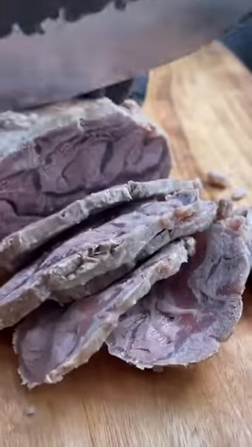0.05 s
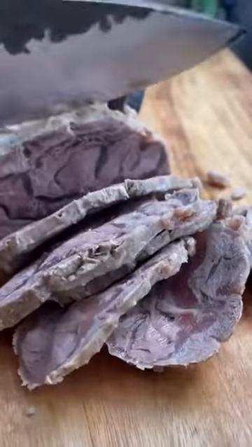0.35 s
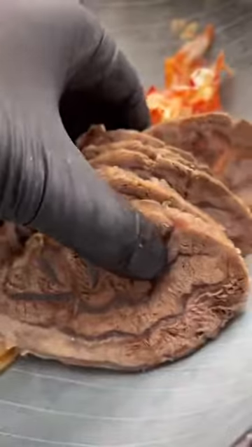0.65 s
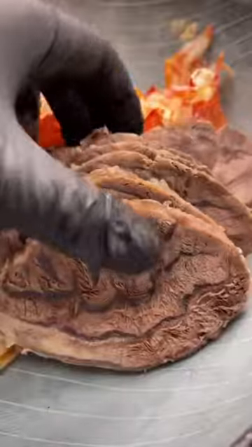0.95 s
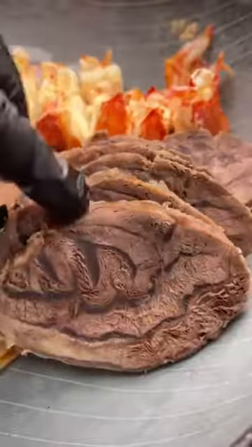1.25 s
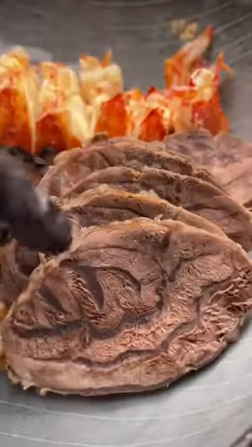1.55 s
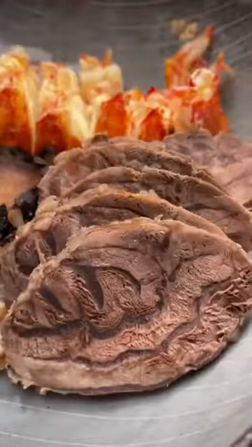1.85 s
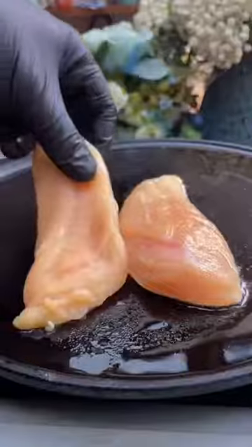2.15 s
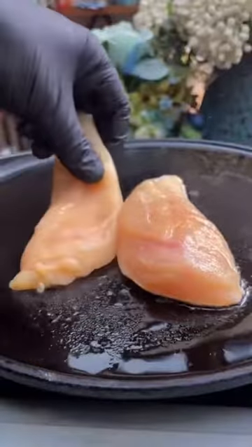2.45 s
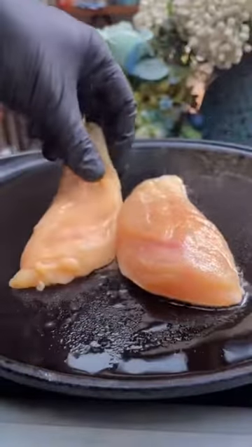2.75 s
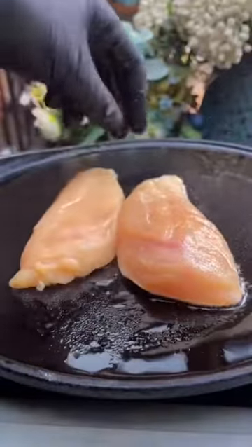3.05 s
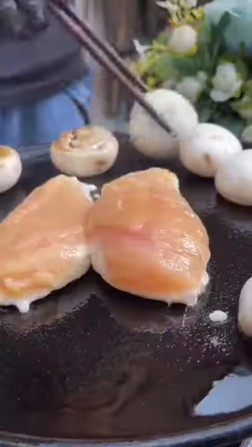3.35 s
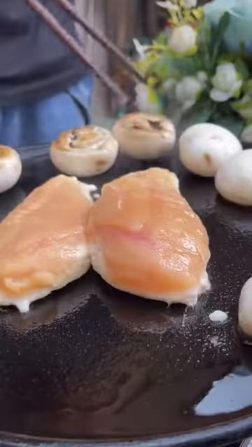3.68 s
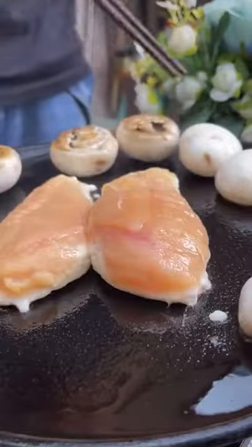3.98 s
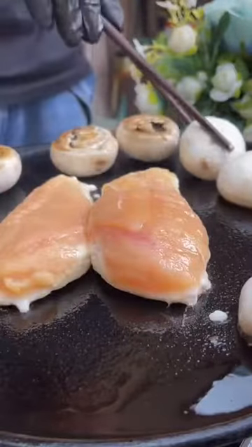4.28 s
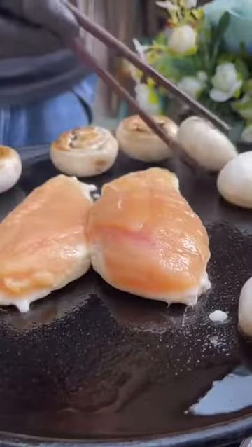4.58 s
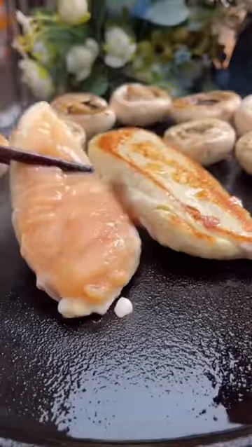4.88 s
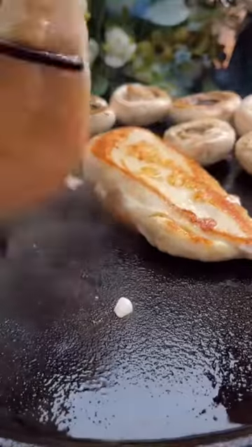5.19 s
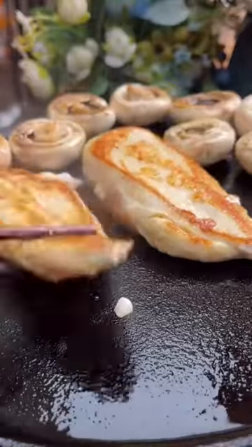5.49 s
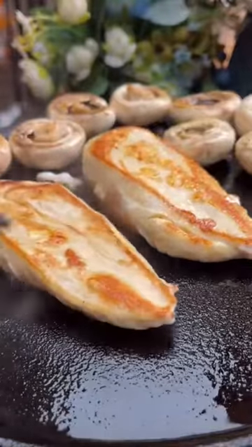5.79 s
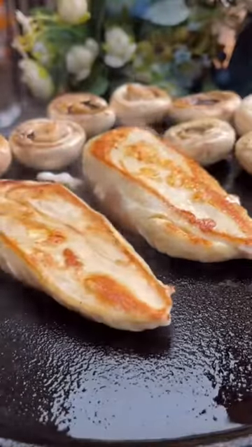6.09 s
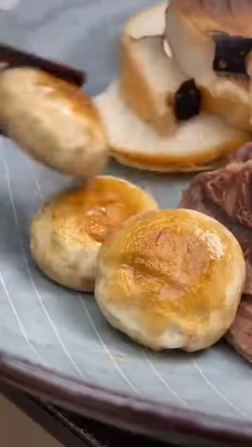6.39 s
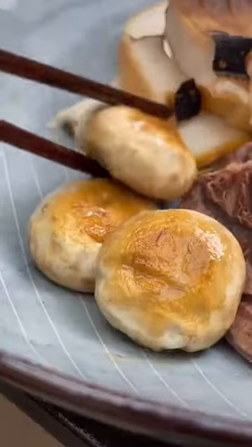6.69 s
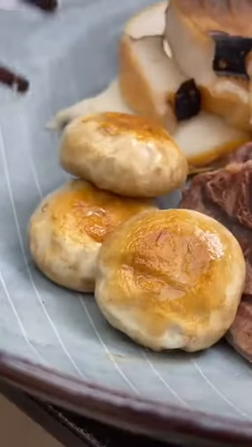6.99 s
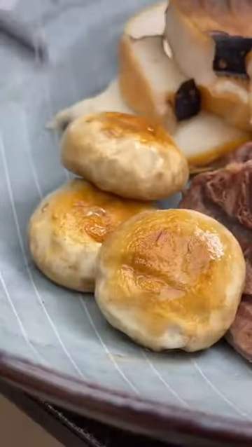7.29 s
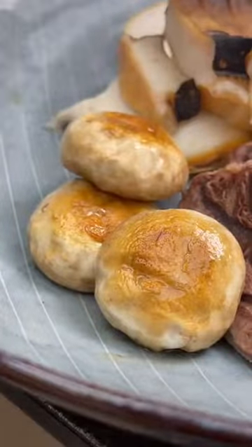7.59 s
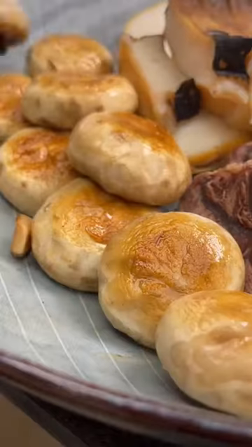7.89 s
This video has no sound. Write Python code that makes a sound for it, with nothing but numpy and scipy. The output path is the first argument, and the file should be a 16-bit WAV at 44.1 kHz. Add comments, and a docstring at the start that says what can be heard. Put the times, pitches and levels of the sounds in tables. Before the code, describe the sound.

Faint wet ticks of meat being cut and handled, then chicken and mushrooms sizzle loudly in hot oil with spits and pops.

```python
"""Beef on the board, chicken in the pan

A humming kitchen, heard close up on a phone's two microphone ports, in seven short shots cut together.
At the board a knife and a gloved hand work moist boiled beef, with small wet ticks. Then chicken and
mushrooms sizzle in an oiled pan: steam bubbles burst and flare up, fat spits, mushrooms sputter as
chopsticks turn them, and food knocks on pan and plate."""
import sys
import numpy as np
from scipy import signal
from scipy.fft import rfft, irfft, next_fast_len
from scipy.io import wavfile
from scipy.ndimage import uniform_filter1d, map_coordinates

SR = 44100
rng = np.random.default_rng(int(sys.argv[2]) if len(sys.argv) > 2 else 0)


def digitize_waveform(pressure):
    """Quantize a signal to 16-bit integers and store it at the path in sys.argv[1].

    Rows of a 2-D input are taken as channels; values are limited to [-1, 1].
    """
    field = np.atleast_2d(pressure).T
    bounded = np.clip(field, -1, 1)
    quanta = np.round(bounded * 32767).astype(np.int16)
    wavfile.write(sys.argv[1], SR, quanta)


N = 350154

# The four stages of frying (chicken, mushrooms, searing, plating): start/s, end/s, bubbles/(1/s),
# size scatter/dB, clumping/dB, cracks/(1/s), level before flares/dB
FRYING_STAGES = [(1.97, 3.244, 3240, 2.5, 2.5, 123, -21.5), (3.242, 4.835, 5700, 2.5, 1, 80, -23),
                 (4.834, 6.286, 12000, 2, 0.5, 11, -20), (6.282, 7.939, 9900, 3, 0.37, 72, -25)]


def sizzle():
    """Two patches of food fry: the nearer to the left of the microphones, the farther to the right."""
    far_gain = amp(-6)
    near = ports(frying(), spread=.06)
    far = far_gain * ports(frying(), spread=.06, side=-1)
    return flaring(near + far) / np.hypot(1, far_gain)


def frying():
    """Water flashes to steam in the oil: clumps of bursting bubbles and sharp cracks over a fine hiss."""
    # Spectrum of the sizzle at each stage: f/Hz, relative level/dB
    chicken = [(120, -39), (450, -28), (800, -22.5), (1250, -21.5), (2400, -13.5), (3500, -13.5),
               (4500, -10.5), (5600, -7.5), (7600, -7.5), (9200, 2), (10300, -1), (11400, -1), (12300, -17),
               (15200, -19.5)]
    mushrooms = [(120, -24.5), (450, -22.5), (800, -20.5), (1250, -14), (2400, -12), (3500, -13.5),
                 (4500, -5.5), (5600, -5.5), (7600, -3.5), (9200, -0.5), (10300, 4), (11400, 3.5),
                 (12300, -5), (15200, -30.5)]
    searing = [(120, -33), (450, -24.5), (800, -18.5), (1250, -17), (2400, -11), (3500, -11), (4500, -4),
               (5600, -3), (7600, -2), (9200, -4.5), (10300, 6), (11400, 3.5), (12300, -6.5), (15200, -17)]
    plating = [(120, -24.5), (450, -20), (800, -18.5), (1250, -17.5), (2400, -14), (3500, -7.5), (4500, -8),
               (5600, -7), (7600, -4), (9200, -3), (10300, 1), (11400, -1), (12300, -11), (15200, -34)]
    pan = np.zeros(N)
    for stage, colour in zip(FRYING_STAGES, (chicken, mushrooms, searing, plating)):
        start, end, rate, scatter_db, clump_db, crack_rate, db = stage
        span = slice(round(start * SR), min(round(end * SR), N))
        size = span.stop - span.start
        clumps = amp(clump_db * (wobble(300, size) + .7 * wobble(55, size)))
        fizz = clumps * bubbles(rate, scatter_db, size) + .52 * rng.standard_normal(size)
        fizz = patchy(fizz, depth_db=1.3)
        fizz = unit(fizz + amp(-8) * clumps * ringing_bubbles(size))
        crack_gain = amp(19.3) * np.sqrt(crack_rate / SR)  # a crack keeps its strength at any rate
        cracks = crack_gain * bubbles(crack_rate, scatter_db=1.7, size=size)
        pan[span] += amp(db) * unit(coloured(fizz + cracks, colour))
    return pan


def bubbles(rate, scatter_db, size, bands=7):
    """Tiny random bursts, rate a second, each with its own size and strength in every band; rms 1."""
    hits = rng.random(size) < rate / SR
    sizes = hits * amp(scatter_db * np.minimum(rng.standard_normal(size), 2.3))
    strengths = sizes * np.clip(rng.standard_normal((bands, size)), -2, 2)
    centres_hz = np.geomspace(500, 13000, bands)
    crossover = lambda hz: np.sqrt([np.interp(hz, centres_hz, row) for row in np.eye(bands)])
    return unit(filtered(strengths, crossover).sum(0))


def ringing_bubbles(size, rate=1200, life_cycles=26):
    """Bubbles in the wet fat ring briefly, with a soft start and a rising pitch; rms 1."""
    when, pitch, strength = rng.random((int(rate * size / SR), 3)).T[..., None]
    hz, n = 1800 + 11000 * pitch, np.arange(SR // 70)
    cycles = hz * n / SR
    age = cycles / life_cycles
    envelope = amp(9 * strength - 30 * age) * np.sqrt(hz) * (1 - np.exp(-cycles))
    rings = envelope * np.sin(2 * np.pi * cycles * (1 + .05 * age))
    positions = (when * size).astype(int) + n
    return unit(np.bincount(positions.ravel(), rings.ravel(), size)[:size])


def flaring(pan, fine_hz=9150):
    """The sizzle swells where fresh moisture meets the oil, and sags briefly at other moments."""
    # Swells and sags: peak t/s, length/s, gain/dB, extra gain above fine_hz/dB
    flares = [(1.992, 0.16, 4.5, -2.5), (2.346, 0.16, -1, 4), (2.655, 0.092, -0.5, 5.5),
              (2.857, 0.15, 1, 0.5), (3.088, 0.2, 4, 1.5), (3.3, 0.31, 3, -1), (3.5, 0.18, 2.5, 0),
              (4.078, 0.18, 1.5, 0.5), (4.757, 0.32, 2, 1.5), (5.05, 0.75, 2, -2), (5.466, 0.35, 1.5, -1),
              (5.82, 0.5, 2.5, 2), (6.133, 0.3, 2.1, 0), (6.354, 0.12, -1.5, 3), (6.415, 0.14, 0.5, 2),
              (6.535, 0.12, -2, 0), (6.667, 0.14, 2, 0.5), (6.87, 0.088, 2.5, -1), (6.975, 0.21, 2, -1),
              (7.112, .12, 1.5, 0), (7.189, 0.03, 4.5, -5), (7.235, 0.12, -3, 2), (7.45, 0.15, -1.5, -1.5),
              (7.656, .07, -1, 1)]
    humps = np.array([swell(s, length, rise=.51) for s, length, *_ in flares])
    gain_db, fine_db = np.array(flares)[:, 2:].T @ humps
    fine_fizz = filtered(pan, lambda hz: 1 - 1 / (1 + (hz / fine_hz) ** 16))
    drift_db = .35 * wobble(12)
    return (pan + (amp(fine_db) - 1) * fine_fizz) * amp(gain_db + drift_db)


def spits():
    """Larger drops burst in the fat with a bright snap."""
    # Bursting drops: t/s, relative level/dB, body below 4.5 kHz/dB
    drops = [(1.9795, -10.5, -21), (1.9942, -10, -21), (2.0118, -7, -20), (2.0477, -10, -23),
             (2.0521, -8, -23), (2.0635, -10, -21), (2.096, -11, -19), (2.174, -9, -24), (2.177, -9, -21),
             (2.2725, -11, -23), (2.3223, -8, -24), (2.3286, -8, -23), (2.3759, -8, -21),
             (2.385, -7.5, -15.5), (2.3911, -8, -24), (2.4677, -9.5, -27), (2.662, -6, -24),
             (2.7005, -9.5, -17), (2.8152, -11.5, -20), (2.8824, -12, -24), (2.8999, -12.5, -18),
             (2.9087, -11, -18), (2.9617, -10, -27), (2.9702, -10.5, -24), (2.9873, -10, -22),
             (3.1807, -9, -26), (3.2066, -10.5, -17), (3.2147, -9, -16), (3.3908, -9, -27),
             (3.6035, -10, -27), (3.6094, -9, -26), (3.6333, -9, -24), (3.7872, -9.5, -22),
             (3.8356, -3, -15.5), (4.1293, -10, -28), (4.1871, -7, -22), (4.2945, -8, -20),
             (4.4467, -10, -21), (4.5562, -9.5, -22), (4.8226, -5, -24), (6.2588, -8, -24),
             (6.3052, -7, -25), (6.3415, -13, -26), (6.3765, -14, -20), (6.4957, -9.5, -28),
             (6.7512, -7.5, -23), (6.9175, -14, -22), (7.0275, -12, -20), (7.1958, -7, -24),
             (7.1995, -11, -20), (7.3872, -9, -22), (7.3912, -13, -18), (7.4486, -12.5, -25),
             (7.4893, -6, -25), (7.5028, -4.5, -23), (7.5373, -13.5, -17), (7.5992, -14.5, -23),
             (7.9341, -8, -22)]
    colour = [(300, -6), (1200, 2), (2500, 6), (4400, 5.5), (5500, -4), (9000, 2), (10800, 7),
              (12300, -9), (15000, -18)]
    snaps = bursts(drops, colour, t60=.003, after_db=-24, after_t60=.016, sharp=.5)
    return amp(13.3) * ports(snaps, spread=.1)


def slaps():
    """Wet chicken meets the oil with a broad, dry pop."""
    # Landings: t/s, relative level/dB
    landings = [(2.7612, -26), (2.9947, -20), (2.998, -22.5), (3.2068, -19.5), (3.211, -26)]
    # Spectrum of a pop: f/Hz, relative level/dB
    colour = [(150, -19), (450, -9), (900, -7), (2600, 3.5), (4200, -2), (6000, -15), (12000, -14)]
    pops = bursts(landings, colour, t60=.007, after_db=-24, after_t60=.03, sharp=1.2)
    return amp(17) * ports(pops, spread=.1)


def sputters():
    """Steam trapped under a mushroom escapes in flurries of hollow pops."""
    # Escapes of steam: t/s, relative level/dB
    escapes = [(3.2828, -30), (3.3165, -29), (3.3293, -22.5), (3.4478, -29), (3.4934, -31), (3.7119, -25),
               (3.7259, -24.5), (3.7335, -22), (3.7424, -24.5), (3.751, -29), (3.7942, -29), (3.9696, -25),
               (4.0, -31), (4.012, -30), (4.0466, -26.5), (4.0637, -24), (4.073, -31), (4.084, -31),
               (4.093, -27), (4.0994, -25.5), (4.106, -28), (4.116, -29), (4.2829, -20.5), (4.2998, -31),
               (4.3419, -30), (4.5537, -28), (4.5852, -30), (4.69, -32), (4.742, -29), (4.7812, -26.5),
               (4.7914, -21.5)]
    colour = [(200, -23), (700, -14), (1200, .5), (1900, 5), (2500, -1), (3500, -21), (9000, -50)]
    pops = bursts(escapes, colour, t60=.005, after_db=-15, after_t60=.045, sharp=1.2)
    return amp(17) * ports(pops, spread=.1)


def jets():
    """Steam squeezes out between mushroom and pan in short spurts, each at its own pitch."""
    # Spurts: t/s, relative level/dB, f/Hz, t60/s
    spurts = [(3.283, -23, 4100, .008), (3.46, -18.5, 4270, 0.015), (3.4943, -18, 4370, .008),
              (3.5302, -19, 4300, .008), (3.633, -22, 4170, 0.0089), (3.6677, -14, 4330, .007),
              (3.8326, -18, 4180, .006), (4.1865, -23, 4020, .008), (4.254, -29, 4300, .008),
              (4.3376, -20, 4330, .007), (4.4456, -22, 4150, 0.0085), (4.579, -15, 4350, 0.0091),
              (4.6884, -16.5, 4330, 0.0081), (4.7534, -22, 4080, 0.0065)]
    # Spectrum of a spurt: multiple of its pitch, relative level/dB
    shape = [(.25, -22), (.72, -13), (1, 6), (1.2, -3), (1.6, -2), (2.2, 1), (3.1, -20)]
    track = np.zeros(N)
    for s, db, hz, t60 in spurts:
        colour = [(multiple * hz, level) for multiple, level in shape]
        track += bursts([(s, db)], colour, t60=t60, after_db=-24, after_t60=.05, sharp=.6)
    return amp(16.8) * ports(track, spread=.19)


def hisses():
    """Steam finds narrow ways out from under the raw chicken as it settles."""
    # Leaks of steam: t/s, length/s, start f/Hz, end f/Hz, level/dB
    leaks = [(2.21, .06, 3900, 3700, -35), (2.545, 0.054, 2350, 2150, -37), (2.8, .06, 6700, 6900, -28),
             (3.005, 0.072, 4300, 5400, -26)]
    return ports(rasps(leaks), spread=.11)


def knocks():
    """Food and chopsticks touch down on pan and plate: a dull thud and one short ring."""
    # Contacts: t/s, ring level/dB, f/Hz, t60/s, relative thud level/dB
    contacts = [(2.211, -38, 815, 0.14, -42), (2.995, -30, 770, 0.056, -37), (3.206, -37, 805, 0.11, -44),
                (3.476, -32, 725, 0.05, -55), (4.185, -44, 560, 0.05, -41), (4.857, -41, 590, 0.044, -41.5),
                (5.079, -33, 543, 0.031, -49), (5.226, -31, 640, 0.028, -37.5),
                (6.407, -32, 1570, 0.036, -39.5), (6.587, -40, 240, 0.12, -49),
                (7.562, -45, 330, 0.031, -39), (7.691, -48, 680, 0.03, -41.5),
                (7.705, -48, 730, 0.025, -36.5), (7.859, -29, 690, 0.034, -31.5)]
    # Spectrum of a thud: f/Hz, relative level/dB
    colour = [(60, -9), (115, 15), (200, 14), (800, 15), (1400, 14.5), (2500, 13.5), (5000, -77)]
    rings, t = np.zeros(N), np.arange(SR // 4) / SR
    soft_onset = 1 - np.exp(-t / .0021)
    for s, db, hz, t60, _ in contacts:
        add(rings, s, amp(db - 60 * t / t60) * np.sin(2 * np.pi * hz * t) * soft_onset)
    impacts = [(s, thud_db) for s, *_, thud_db in contacts]
    thuds = bursts(impacts, colour, t60=.0057, after_db=-8.5, after_t60=.18)
    return ports(rings + amp(25.5) * thuds, spread=.045)


def pan_ring(mode_hz=805, width_hz=55):
    """The crackling under the raw chicken sets the pan's lowest mode ringing faintly."""
    t = np.arange(N) / SR
    start, end = FRYING_STAGES[0][:2]
    mode = lambda hz: 1j * hz * width_hz / (mode_hz ** 2 - hz ** 2 + 1j * hz * width_hz)
    ring = unit(filtered(bubbles(rate=180, scatter_db=-.5, size=N), mode))
    return ports(amp(-55) * ring * (t > start) * (t < end), spread=.15)


def beef(resting_db=-80.5):
    """Moist meat rustles softly under each stroke of knife and glove, with single sticky ticks."""
    # Strokes on the meat: peak t/s, length/s, level/dB
    strokes = [(0.293, 0.35, -72), (0.49, 0.092, -59), (0.578, 0.22, -64), (0.688, 0.12, -62),
               (0.823, 0.21, -65), (1.22, 0.43, -75)]
    # Wet ticks: t/s, relative level/dB, body below 4.5 kHz/dB
    wet_ticks = [(0.1411, -54, 6), (0.2337, -42.5, 0), (0.2556, -45, -4), (0.3846, -52, -6),
                 (0.4997, -48, -4), (0.5821, -53, 3), (0.613, -55, 3), (0.6586, -43, -5), (0.6818, -41, 4),
                 (0.7089, -53, 0), (0.8015, -44.5, -8), (0.813, -50, -8), (0.8259, -54, -6),
                 (0.8638, -52, -6), (0.878, -59, 0), (0.9393, -57, 6), (0.953, -54, -8), (0.9629, -52, 0),
                 (1.2432, -53, -6), (1.2596, -49, -6), (1.468, -60, -4), (1.8985, -57, 0)]
    # Spectrum of a tick: f/Hz, relative level/dB
    tick_colour = [(500, -15), (1700, -4), (4200, -4.5), (6000, -2), (8000, -2), (11000, 6), (12300, -9),
                   (15000, -20)]
    rub_colour = [(500, -15), (2000, -9), (4200, -6), (6000, -3.5), (8000, 1), (11000, 9),
                  (12300, -18), (15000, -22)]
    crackle = bubbles(rate=6000, scatter_db=2.5, size=N) * amp(1.6 * wobble(150))
    pressure = sum(amp(db) * swell(s, length, rise=.48) for s, length, db in strokes)
    rub = unit(coloured(patchy(crackle, depth_db=3.5), rub_colour)) * (pressure + amp(resting_db))
    ticks = bursts(wet_ticks, tick_colour, t60=.005, after_db=-16, after_t60=.04, sharp=.55)
    return ports(rub + amp(17.5) * ticks, spread=.12)


def dish_tap():
    """The dish clicks and rings briefly as the hand lets go."""
    # Modes of the dish: f/Hz, relative level/dB, t60/s
    modes = [(2190, 6, 0.018), (2480, -5, 0.016), (4480, -7, 0.014), (2140, -8, 0.076)]
    track, t = np.zeros(N), np.arange(SR // 4) / SR
    ring = sum(amp(db - 60 * t / t60) * np.sin(2 * np.pi * hz * t) for hz, db, t60 in modes)
    add(track, .9995, amp(-44) * ring)
    colour = [(800, -16), (1700, -7), (2400, 10), (3400, -6), (4500, 1), (5500, -11), (8000, -18),
              (12000, -24)]
    click = bursts([(.9993, -26.5)], colour, t60=.005, after_db=-24, after_t60=.04, sharp=1)
    return ports(track + click, spread=.2)


def squeaks():
    """Blade and glove slip unevenly on the meat, with faint, narrow rasps."""
    # Slips: t/s, length/s, start f/Hz, end f/Hz, level/dB
    slips = [(0.009, 0.15, 2730, 2090, -62.5), (0.17, 0.24, 3900, 3580, -72), (.262, .06, 6200, 5700, -70),
             (0.464, 0.17, 1100, 1050, -65), (.56, .08, 5360, 6100, -67), (.725, .07, 5930, 5750, -77),
             (1.06, .05, 4200, 4000, -69), (1.19, .05, 5600, 6270, -70)]
    return ports(rasps(slips), spread=.18)


def appliance_hum():
    """Kitchen appliances hum, each line unsteady in phase and level."""
    # Hum lines: f/Hz, level/dB
    lines = [(50.5, -60), (97, -65.5), (146, -63.5), (195, -69.5), (247.6, -64.5), (352, -69.5), (603, -65),
             (673, -79)]
    hum, t = np.zeros(N), np.arange(N) / SR
    for hz, db in lines:
        tone = np.sin(2 * np.pi * hz * t + .8 * wobble(hz ** .5))
        flutter = amp(3.5 * wobble(2 * hz ** .5))
        hum += amp(db) * unit(tone * flutter)
    return hum


def room_tone():
    """Board, stove and serving plate each have their own air noise; the hum is heard at the board."""
    # Air noise at each microphone position: f/Hz, relative level/dB
    board_air = [(15, -23), (28, -32), (50, -14), (68, -11.5), (88, 0.5), (115, -9), (247, -12.5),
                 (385, -18), (585, -14.5), (748, -21.5), (1300, -26.5), (1520, -24.5), (1860, -31.5),
                 (2160, -28), (3620, -42.5), (4860, -45), (6070, -51), (9000, -55), (11700, -72),
                 (19800, -120)]
    stove_air = [(20, -30), (50, -3.5), (90, -3), (150, -1.5), (260, -3.5), (400, -13), (900, -27.5),
                 (3000, -39)]
    plate_air = [(20, -39), (50, 2), (75, -1.5), (120, -6), (250, -9.5), (500, -15), (3000, -67)]
    t = np.arange(N) / SR
    noise = lambda spectrum: unit(coloured(rng.standard_normal(N), spectrum))
    chicken_s, mushrooms_s, searing_s, plating_s = (stage[0] for stage in FRYING_STAGES)
    at_board, at_plate = t < chicken_s, t > plating_s
    stove_db = curve([(2, -51), (3.2, -54), (3.3, -58), (6.3, -58)])
    air = at_board * (appliance_hum() + amp(-53.5) * noise(board_air))
    air += (~at_board & ~at_plate) * amp(stove_db) * noise(stove_air)
    air += at_plate * amp(-55.5) * noise(plate_air)
    # diffuse room sound differs between the ports in the midrange
    diffuse_db = np.select([t < mushrooms_s, t < searing_s, ~at_plate], [-61, -64, -80], -58)
    colour = [(30, -22), (150, -7.5), (650, 3.5), (1200, -2.5), (2000, -20), (6000, -27), (14000, -36)]
    diffuse = amp(diffuse_db) * noise(colour)
    return air + np.array([diffuse, -diffuse])


def ports(x, spread, side=1):
    """The port on the source's side (1 left, -1 right) leads in the treble; spread scales reflections."""
    # Lead of the nearer port: f/Hz, phase/rad
    lead = [(2200, 0.02), (3200, .3), (3800, .62), (4400, 1.2), (4900, 3.2), (5400, 5.5), (6000, 6.28),
            (6600, 6.85), (8000, 8.4), (8550, 9.3), (9300, 9.5), (9700, 10.05), (10600, 10.95),
            (11400, 11.7), (11900, 12.5), (13600, 12.65), (14500, 14), (15200, 15.5)]
    direct = filtered(x, lambda hz: np.exp(np.outer([.5j, -.5j], np.sign(side) * along(lead, hz))))
    t = np.arange(SR // 8) / SR
    tail = rng.standard_normal((2, len(t))) * amp(-60 * t / .08) * (t > .001)  # one for each port
    tail /= np.linalg.norm(tail[0])
    colour = [(600, 3), (1700, -8), (3800, 2), (6300, 8), (9000, -4), (12500, 5)]
    tail = filtered(tail, lambda hz: amp(along(colour, hz)))
    return direct + spread * signal.fftconvolve(x[None], tail, axes=1)[:, :N]


def bursts(events, spectrum, t60, after_db, after_t60, sharp=0):
    """A snap and a weaker spray per (t/s, level/dB, optional body/dB); sharp weighs an opening pulse."""
    track, t = np.zeros(N), np.arange(SR // 12) / SR
    for s, db, *body in events:
        envelope = amp(-60 * t / t60) + amp(after_db - 60 * t / after_t60)
        spray = envelope * rng.standard_normal(len(t))
        spray[0] += sharp * np.linalg.norm(spray)
        snap = coloured(spray, [(hz, level + sum(body) * (hz < 4500)) for hz, level in spectrum])
        add(track, s, amp(db) * snap / np.linalg.norm(snap))
    return track


def rasps(rows):
    """Each row is a narrow, rough, gliding band of sound."""
    track = np.zeros(N)
    for s, length, start_hz, end_hz, db in rows:
        size = int(length * SR)
        hz = np.linspace(start_hz, end_hz, size) * (1 + .14 * wobble(1800, size))
        rasp = unit(np.sin(2 * np.pi * np.cumsum(hz) / SR) * amp(3.1 * wobble(400, size)))
        add(track, s, amp(db) * rasp * np.hanning(size))
    return track


def patchy(x, depth_db, size=256):
    """The sound gathers now at one pitch, now at another, in patches of about 700 Hz by 25 ms; rms 1."""
    spectra = signal.stft(x, nperseg=size)[2]
    patches = uniform_filter1d(rng.standard_normal(spectra.shape), size=4, axis=0)
    patches = uniform_filter1d(patches, size=9, axis=1)
    return unit(signal.istft(spectra * amp(depth_db * unit(patches)), nperseg=size)[1][:len(x)])


def coloured(x, spectrum, size=2048):
    """x through a minimum-phase filter shaped by (f/Hz, level/dB) points."""
    cepstrum = irfft(np.log(amp(along(spectrum, np.fft.rfftfreq(size, 1 / SR)))))
    cepstrum[1:size // 2] *= 2
    cepstrum[size // 2 + 1:] = 0
    return signal.fftconvolve(x, irfft(np.exp(rfft(cepstrum))))[:len(x)]


def filtered(x, response):
    """x through a complex response, given as a function of frequency."""
    size = x.shape[-1]
    padded = next_fast_len(size + 8192)
    return irfft(rfft(x, padded) * response(np.fft.rfftfreq(padded, 1 / SR)), padded)[..., :size]


def wobble(rate, size=N):
    """A smooth random curve, rate knots a second."""
    knots = rng.standard_normal(int(size * rate / SR) + 4)
    coarse = np.arange(0, size + 16, 16)
    return np.interp(np.arange(size), coarse, map_coordinates(knots, [coarse * rate / SR]))


def swell(s, length, rise):
    """A smooth hump of height 1 peaking at time s; rise is the share of its length spent swelling."""
    return np.sin(np.pi / 2 * curve([(s - rise * length, 0), (s, 1), (s + (1 - rise) * length, 0)])) ** 2


def curve(rows):
    """(t/s, value) rows as one value per sample."""
    return np.interp(np.arange(N) / SR, *np.transpose(rows))


def along(points, hz):
    """(f/Hz, value) points read at hz on a log axis."""
    freqs, values = np.transpose(points)
    return np.interp(np.log(hz + 1), np.log(freqs + 1), values)


def add(track, s, sound):
    """Mix a sound into a track at time s."""
    part = track[max(round(s * SR), 0):][:len(sound)]
    part += sound[:len(part)]


def amp(db):
    """Decibels to gain."""
    return 10 ** (np.asarray(db) / 20)


def unit(x):
    """Scale to rms 1."""
    return x / np.sqrt(np.mean(x ** 2) + 1e-20)


def scene():
    """All sources at the two ports, dipping for a moment at each cut."""
    # Dips at the cuts: start/s, end/s, gain/dB
    cuts = [(.453, .469, -25), (1.959, 1.968, -25), (3.238, 3.248, -12), (4.829, 4.845, -14),
            (6.279, 6.29, -16), (7.778, 7.8, -24)]
    t = np.arange(N) / SR
    dip_db = sum(db * ((t > start) & (t < end)) for start, end, db in cuts)
    dips = amp(uniform_filter1d(dip_db, size=220))  # 5 ms ramps
    pan = sizzle() + pan_ring() + spits() + slaps() + hisses() + sputters() + jets()
    return dips * (pan + knocks() + beef() + squeaks() + dish_tap() + room_tone())


def record(dry, ceiling=.9, top_hz=15700):
    """The phone rounds off the loudest snaps near full scale and keeps nothing above its band limit."""
    rounded = dry / (1 + np.abs(dry / ceiling) ** 8) ** (1 / 8)
    return filtered(rounded, lambda hz: hz < top_hz)


dry = scene()
out = record(dry)
digitize_waveform(out)
```